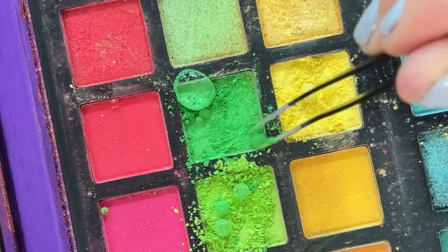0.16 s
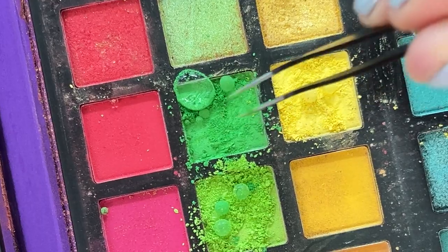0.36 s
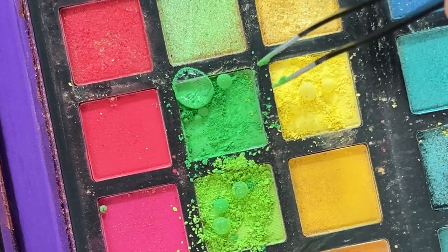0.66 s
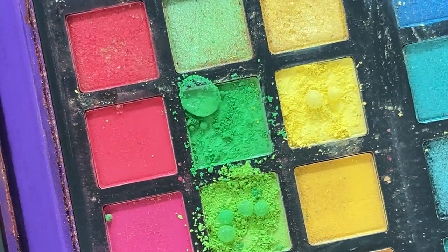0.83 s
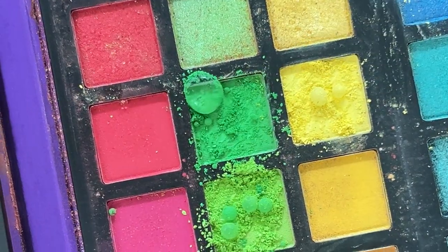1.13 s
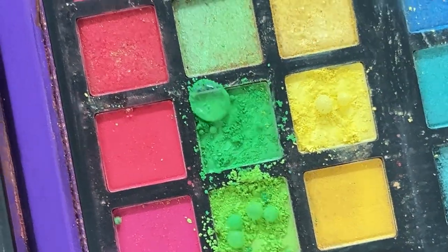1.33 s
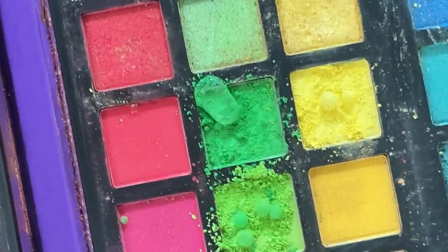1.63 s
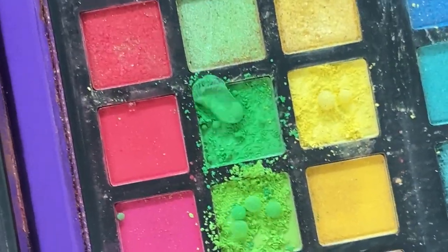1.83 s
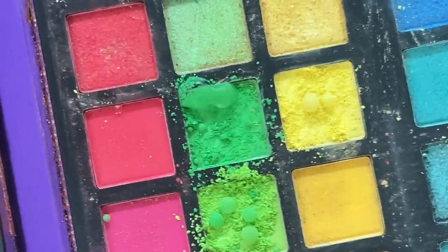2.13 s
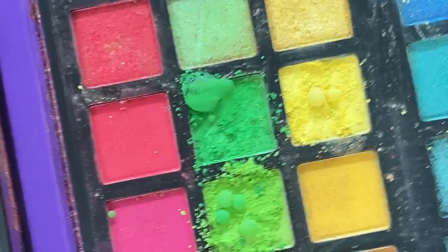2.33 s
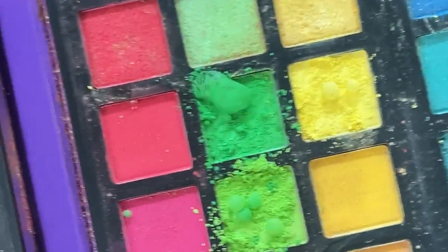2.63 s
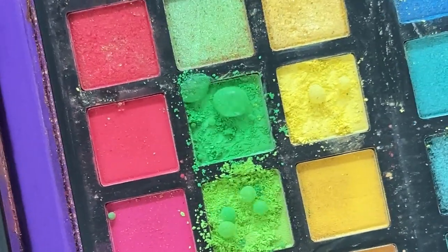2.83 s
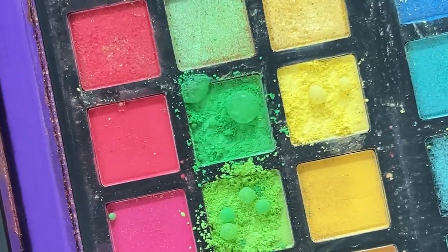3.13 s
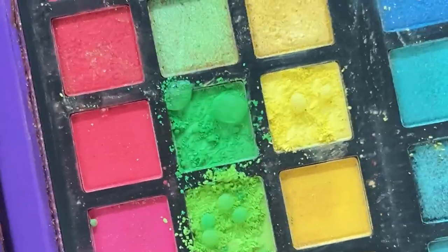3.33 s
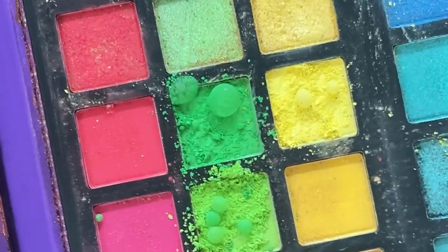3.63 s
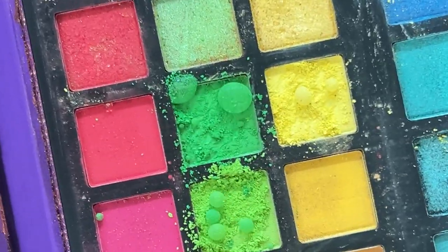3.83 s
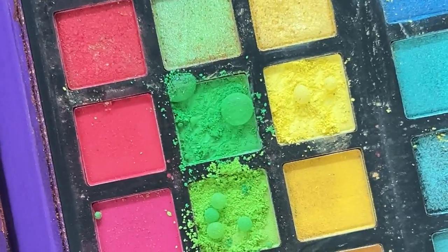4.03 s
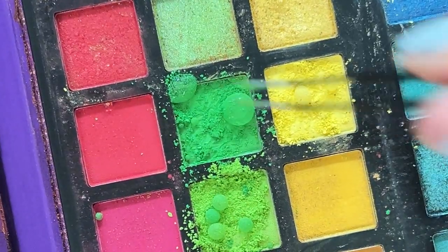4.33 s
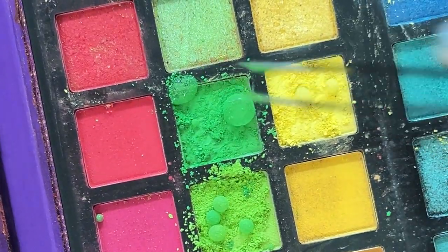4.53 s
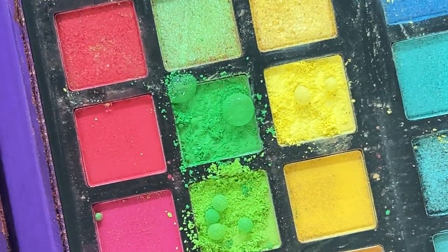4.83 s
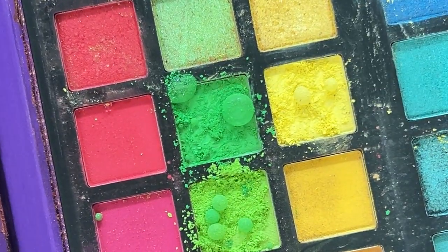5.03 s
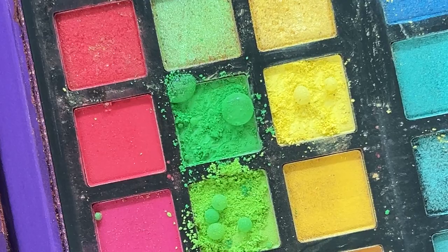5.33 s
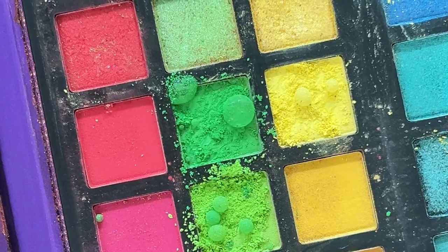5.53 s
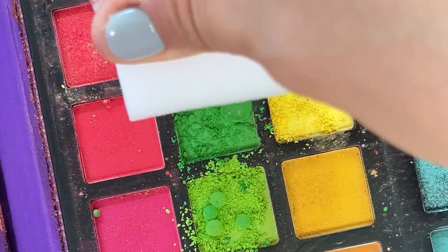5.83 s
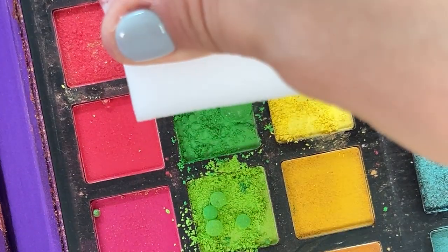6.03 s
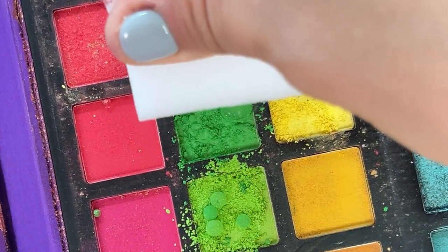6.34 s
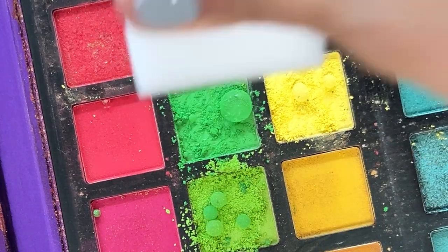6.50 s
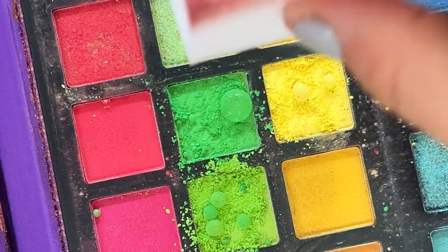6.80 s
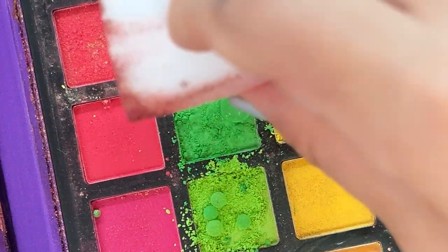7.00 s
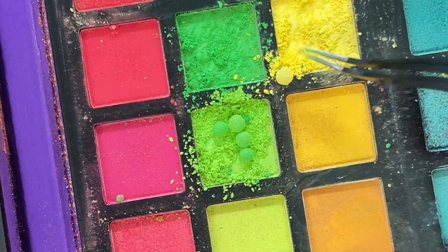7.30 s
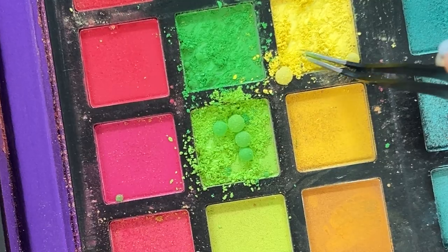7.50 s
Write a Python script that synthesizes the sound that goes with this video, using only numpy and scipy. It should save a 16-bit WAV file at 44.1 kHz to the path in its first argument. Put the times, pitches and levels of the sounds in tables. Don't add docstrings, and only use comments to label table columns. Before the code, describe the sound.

A small quiet room, heard very close, with soft low rumble, steady hiss and barely audible high ticking from the lens drive. Two faint taps come at 0.2 s, then light scrapes until 1.5. From 1.8 to 3.1 tweezer tips knock a hollow plastic palette about every 0.2 s, strongest at first, each a doubled clack with a short boxy boom, while quick gritty strokes stir the powder. Sparser taps follow at 3.3, 3.5 and 3.8. A far bird whistles thinly around 3.9-4.3. A weak tap sounds at 4.5. From 5.25 the tweezers slip with tiny ticks, hit hard at 5.53 with bright steel ringing, rebound at 5.6, and are cut off at 5.63. Near quiet follows. From 6.5 to 7.1 paper slips and drags, loudest around 6.6-6.8, breaking into crisp snaps and crackles. Then only hiss, rumble and one faint tap at 7.5.

```python
import sys
import numpy as np
from scipy import signal
from scipy.fft import rfft, irfft, next_fast_len
from scipy.io import wavfile
from scipy.ndimage import map_coordinates

SR = 44100
rng = np.random.default_rng(int(sys.argv[2]) if len(sys.argv) > 2 else 0)


def level_to_linear(level):
    exponent = np.asarray(level, float) / 20
    return 10 ** exponent


def persist_wave(psi):
    counts = np.round(np.clip(psi, -1, 1) * 32767).astype(np.int16)
    wavfile.write(sys.argv[1], SR, np.atleast_2d(counts).T)


N = 337955

# frequency in Hz, level in dB per Hz.
SLIDING = [(400, -23.5), (1500, -0.5), (2500, -4), (3600, 1.5), (4500, -7.5), (6200, -4), (7000, -0.5),
           (7800, -6), (11000, -9), (15500, -11.5)]


def unit(x):
    return x / np.sqrt(np.mean(x ** 2) + 1e-20)


def along(points, hz):
    f, v = np.transpose(points)
    return np.interp(np.log(hz + 1), np.log(f + 1), v)


def curve(rows):
    s, db = np.transpose(rows)
    return level_to_linear(np.interp(np.arange(N) / SR, s, db, left=-140, right=-140))


def wobble(rate):
    knots = rng.standard_normal(int(N * rate / SR) + 4)
    return map_coordinates(knots, [np.arange(N) * rate / SR])


def filtered(x, response):
    m = next_fast_len(N + SR // 2)
    return irfft(rfft(x, m) * response(np.fft.rfftfreq(m, 1 / SR)), m)[..., :N]


def hiss(spectrum, grain_db=0):
    grain = level_to_linear(grain_db * np.minimum(rng.exponential(size=N), 4))
    white = rng.standard_normal(N) * grain
    return unit(filtered(white, lambda hz: level_to_linear(along(spectrum, hz))))


def add(track, s, piece):
    part = track[max(round(s * SR), 0):][:len(piece)]
    part += piece[:len(part)]


def fade(t60):
    return level_to_linear(-60 * np.arange(SR // 3) / SR / t60)


def swells(rows, edge):
    out = np.zeros(N)
    for s, db, length in rows:
        reach = min(2 * length, s)
        t = np.arange(-reach, reach, 1 / SR)
        add(out, s - reach, level_to_linear(db) * np.exp(-np.abs(t / (0.58 * length)) ** edge))
    return out


def ring(modes, scatter_db, detune):
    t = np.arange(SR // 3) / SR
    hz, db, t60, rise = np.transpose(modes)[:, :, None]
    chance = rng.standard_normal((2, len(modes), 1))
    decay = level_to_linear(db + scatter_db * chance[0] - 60 * t / t60)
    onset = 1 - np.exp(-t / rise)
    tone = np.sin(2 * np.pi * hz * (1 + detune * chance[1]) * t)
    return np.sum(decay * onset * tone, axis=0)


def room(x):
    # frequency in Hz, t60 in seconds.
    decay_times = [(200, 0.93), (2000, 0.32), (10000, 0.22)]
    hz, t, z = signal.stft(rng.standard_normal(SR // 2), SR, nperseg=256)
    dying = level_to_linear(-60 * t / along(decay_times, hz)[:, None])
    tail = signal.istft(z * dying, SR, nperseg=256)[1]
    return signal.fftconvolve(x, tail / np.linalg.norm(tail))[:N]


def background():
    # frequency in Hz, level in dB per Hz.
    rumble_colour = [(15, -44.5), (25, -20.5), (43, -11.5), (60, 3), (75, -4), (100, -10), (140, -21),
                     (200, -61)]
    drone_colour = [(50, -38.5), (100, -3.5), (130, -1), (235, -3.5), (300, -5), (350, -7), (385, -14),
                    (450, -24), (600, -49)]
    mic_colour = [(300, 1.5), (500, -3), (800, -6.5), (1300, -0.5), (2000, -2.5), (3000, -2), (4000, -12.5),
                  (5000, -24.5), (6200, -14.5), (7500, -0.5), (8600, -17.5), (9700, -26), (12000, -12.5),
                  (15000, -10)]
    # time in seconds, level in dB.
    stirred = [(0, -5), (1, -1.5), (2, 0.5), (2.7, 1.5), (3.3, -2.5), (4.8, -1), (5.45, 4.5), (6.25, -2.5),
               (6.6, 6.5), (7.66, -4.5)]
    # centre in seconds, level in
    # dB, length in seconds.
    bumps = [(1.02, -62, 0.041), (1.9, -61, 0.063), (2.75, -66, 0.047), (2.93, -68, 0.09), (3.7, -69, 0.13),
             (4.02, -69, 0.049), (4.33, -70, 0.057), (4.58, -62, 0.1), (5.1, -53.5, 0.064),
             (5.33, -59.5, 0.11), (5.555, -48, 0.034), (5.87, -60, 0.11), (6.43, -59.5, 0.096),
             (6.72, -62, 0.12), (7.2, -60.5, 0.18), (7.5, -65.5, 0.089)]
    rumble = (level_to_linear(-69 + 1.4 * wobble(9)) + swells(bumps, edge=1.7)) * hiss(rumble_colour)
    drone = curve(stirred) * level_to_linear(-70.5 + 2.2 * wobble(14)) * hiss(drone_colour)
    return rumble + drone + level_to_linear(-70.5 + 0.3 * wobble(2.7)) * hiss(mic_colour)


def side_air():
    # frequency in Hz, level in dB per Hz.
    air_colour = [(100, -40.5), (230, -3.5), (700, -2), (1500, -13.5), (1850, -48)]
    return level_to_linear(-81.0) * hiss(air_colour) * [[1], [-1]]


def lens():
    # start of the shot in seconds, a moment its beat of ticks falls on in seconds.
    shots = [
        (0, 0.033),
        (.853, 0.78),
        (5.626, 5.647),
        (7.12, 7.4),
    ]
    t = np.arange(N) / SR
    start, first = np.transpose(shots)
    shot = np.maximum(np.searchsorted(start, t, "right") - 1, 0)
    beat = (t - first[shot]) * 30
    blip = np.exp(-((beat - np.round(beat)) / 0.059) ** 2)
    return level_to_linear(-80.0 + 1.7 * wobble(25)) * blip * np.sin(2 * np.pi * 9140 * t)


def taps():
    # time in seconds, peak in dB, hollow in dB, lid in dB, cavity pitch in Hz.
    blows = [(0.199, -53.5, -5.5, -21, 310), (0.237, -54.5, -6.5, -13, 306), (1.494, -50, -13, -17, 395),
             (1.789, -27.5, -18.5, -8, 394), (1.971, -31.5, -11, -7.5, 389), (2.17, -34, -11, -6, 377),
             (2.338, -34.5, -16, -11, 404), (2.502, -37, -11.5, -5.5, 405),
             (2.739, -31.5, -17.5, -9.5, 444), (2.894, -38.5, -17.5, -17.5, 427),
             (3.049, -52, -12, -22, 403), (3.266, -52, -4.5, -21, 331), (3.534, -36.5, -18, -18, 404),
             (3.829, -34, -8.5, -7.5, 389), (4.006, -48, -8, -38, 376), (4.517, -42, -20, -23, 320),
             (4.672, -60, -4, -25, 426), (5.1, -52.5, -14, -17, 467), (7.485, -52, -11.5, -13, 311)]
    # ratio to the cavity pitch, level in dB, t60 in seconds, rise in seconds.
    cavity_modes = [(1.009, 3, 0.11, 0.0049), (0.776, -10.5, 0.061, 0.0034), (1.245, -12.5, 0.029, 0.0042)]
    # frequency in Hz, level in dB, t60 in seconds, rise in seconds.
    lid_modes = [(655, -5.5, 0.044, 0.00073), (895, 0, 0.0264, 0.0015), (1274, -0.5, 0.04, 0.0011),
                 (1401, 1, .03, 0.0012), (1534, 3.5, 0.029, 0.0014), (1720, -14, 0.026, 0.0011)]
    tray_modes = [(397.6, -1, 0.21, 0.008)]
    # frequency in Hz, level in dB per Hz.
    knock_colour = [(150, -32.5), (300, 8), (500, 1.5), (800, -4), (1400, -6), (1800, -21), (2200, -42)]
    second_tip_s = 0.0053
    out, knock, tick = np.zeros((3, N))
    grip = np.exp(-(np.arange(SR // 3) / SR / 0.015) ** 3)
    for s, db, hollow_db, lid_db, cavity_hz in blows:
        cavity = ring(np.multiply(cavity_modes, [cavity_hz, 1, 1, 1]), scatter_db=1.0, detune=0.0048)
        add(out, s + 0.00402, level_to_linear(db + hollow_db + 8) * grip * cavity)
        add(out, s + 0.006, level_to_linear(db + hollow_db - 8) * ring(tray_modes, scatter_db=1.5, detune=0.008))
        for at, tip_db in ((s, db), (s + second_tip_s, db - 6.0)):
            lid = grip * ring(lid_modes, scatter_db=0.5, detune=0.028)
            add(out, at - 0.0005, level_to_linear(tip_db + lid_db + 0.5) * lid)
            add(knock, at, level_to_linear(tip_db - 14.0) * fade(0.053))
            add(tick, at - 0.001, level_to_linear(db + lid_db - 13.5) * fade(0.0052))
    return out + knock * hiss(knock_colour) + tick * rng.standard_normal(N)


def scrapes():
    # centre in seconds, level in dB, length in seconds, brightness in dB.
    lone = [(0.223, -85.5, 0.038, 4), (0.727, -72, 0.071, 1.5), (0.878, -81, 0.054, 5),
            (0.975, -63.5, 0.056, -9), (1.159, -79.5, 0.046, 11), (1.428, -62.5, 0.098, -9.5),
            (1.575, -69, 0.054, -10.5), (1.816, -64.5, 0.054, -12.5), (2.089, -56, 0.057, -7),
            (3.309, -53, 0.0595, -7.5), (4.546, -77, 0.09, -1.5), (5.108, -79.5, 0.11, 2.5),
            (5.759, -73, 0.065, -3)]
    # centre in seconds, level in dB.
    stirring = [(1.323, -66.5), (1.729, -63), (1.913, -66.5), (2.003, -58.5), (2.192, -58), (2.28, -64),
                (2.378, -56.5), (2.483, -56), (2.589, -56), (2.688, -55.5), (2.793, -60.5), (2.998, -71),
                (3.105, -69), (3.207, -82), (3.456, -62), (3.554, -71.5), (3.69, -75.5), (3.845, -72)]
    # frequency in Hz, level in dB per Hz.
    powder_colour = [(400, -8), (800, -4), (1400, 3), (2200, 0.5), (3900, 0.5), (5800, -2.5), (8000, -9.5),
                     (12000, -39)]
    dust_colour = [(3000, -34), (4800, -11), (6000, -0.5), (8000, -1.5), (10500, -4.5), (15500, 0.5)]
    strokes = list(lone)
    for s, db in stirring:
        lighter_db = db + 56
        length = max(0.058 + 0.1 * lighter_db, 0.038)
        bright_db = max(-4 + 1.5 * lighter_db, -8.5)
        strokes.append((s, db, length, bright_db))
    body = swells([(s, db + 1.5, length) for s, db, length, _ in strokes], edge=2.8)
    bright = swells([(s, db + bright_db + 7.0, length) for s, db, length, bright_db in strokes], edge=3.1)
    crumble = level_to_linear(1.64 * wobble(120))
    return crumble * (body * hiss(powder_colour, grain_db=3.0) + bright * hiss(dust_colour, grain_db=2.0))


def paper():
    # time in seconds, peak in dB, flap in dB.
    snaps = [(2.088, -40, -15), (5.746, -52.5, -4), (6.498, -45.5, -8.5), (6.526, -38, -7.5),
             (6.558, -48, -2), (6.5983, -34, -6), (6.6195, -31, -7), (6.645, -38, -5.5), (6.9205, -48, -6),
             (6.576, -33, 6), (6.589, -27, -4), (6.7226, -34, -5), (6.6941, -26, -1), (6.7096, -31, -9.5),
             (6.7135, -34, -8), (6.7422, -26.5, -4), (6.8374, -33.5, 0.5), (6.8432, -32, 1),
             (6.8512, -40, 7), (6.8618, -43, 9.5), (6.8743, -44, -5), (6.8818, -36.5, 3.5),
             (6.898, -45, -4), (6.9075, -34, -3.5), (6.9164, -47, 8.5), (6.9346, -29, -10.5),
             (6.947, -29.5, -11), (6.9533, -36, -3), (6.958, -45, -5), (6.9707, -32, -6), (6.9913, -42, 1),
             (6.9848, -31, -5.5), (7.012, -34, -15), (7.022, -52.5, 7), (7.0335, -30, -11),
             (7.057, -34, -6), (7.072, -33, -2.5), (7.0899, -38, -1.5), (7.113, -48.5, 4.5)]
    # time in seconds, peak in dB, flap in dB.
    slips = [
        (6.5224, -44.5, -11),
        (6.5693, -39, -1.5),
        (6.597, -34, -5),
        (6.616, -32.5, -7.5),
        (6.6421, -34.5, -11.5),
        (6.6695, -35.5, -8.5),
        (6.689, -32.5, -20),
        (6.707, -35.5, -7.5),
        (6.7217, -44, 0.5),
    ]
    # centre in seconds, level in dB, length in seconds.
    drags = [
        (6.47, -72.5, .06),
        (6.51, -61, 0.0395),
        (6.56, -57, 0.057),
        (6.655, -61, .05),
        (6.76, -49.5, 0.1),
        (6.93, -68, .3),
    ]
    # centre in seconds, level in dB, length in seconds.
    brushes = [
        (6.475, -67, .06),
        (6.53, -55.5, 0.066),
    ]
    # frequency in Hz, level in dB per Hz.
    flap_colour = [(250, -20), (500, -8), (900, -3), (1250, -4), (1700, -9), (2600, -23.5)]
    ripple_colour = [(400, -26), (700, -4), (1100, 0), (1700, -0.5), (2500, -5.5), (4500, -14.5)]
    crisp_colour = [(400, -28), (800, 2), (1500, -9), (2800, -7), (4300, 4.5), (5400, 0), (7000, -4.5),
                    (15500, -11)]
    soft_colour = [(600, -24), (1100, -7), (2200, -1), (3000, 0), (3900, -3.5), (4800, -16), (8000, -14),
                   (12000, -26)]
    bend_s = 0.0028

    fibre = swells(drags, edge=4.6) * level_to_linear(1.36 * wobble(200))
    flap, ripple, clicks = np.zeros((3, N))
    add(flap, 0, level_to_linear(-7.5) * fibre)
    t = np.arange(SR // 20) / SR
    # events, length in seconds, abruptness of the stop, low layer, its lateness in seconds
    for rows, length, edge, low, late in ((slips, 0.013, 2.5, flap, 0), (snaps, 0.002, 1.5, ripple, 0.0012)):
        burst = (1 - np.exp(-t / 0.000599)) * np.exp(-(t / length) ** edge)
        for s, db, flap_db in rows:
            add(fibre, s, level_to_linear(db - 12.5) * burst)
            add(low, s + late, level_to_linear(db + flap_db - 5.5) * burst)
    for s, db, _ in snaps:
        add(clicks, s, level_to_linear(db - 5) * unit(rng.standard_normal(12) * fade(0.0004)[:12]))

    def bend(hz):
        return level_to_linear(along(crisp_colour, hz)) * np.exp(-4j * np.pi * bend_s * np.sqrt(1000 * hz))

    sheet = flap * hiss(flap_colour) + ripple * hiss(ripple_colour)
    arrival = swells(brushes, edge=2.5) * hiss(soft_colour, grain_db=3.0)
    return fibre * hiss(SLIDING, grain_db=2.5) + sheet + filtered(clicks, bend) + arrival


def bird():
    # start in seconds, length in seconds, from Hz, to Hz, level in dB.
    whistles = [
        (3.915, .035, 3650, 3700, -82),
        (3.957, .095, 4060, 4000, -77),
        (3.94, .07, 2900, 2880, -82),
        (4.075, .04, 3850, 3820, -82),
        (4.13, .055, 3880, 4060, -82),
        (4.16, .045, 2960, 2720, -79),
        (4.205, .06, 3990, 3740, -79),
        (4.275, 0.037, 2970, 3060, -83),
    ]
    # centre in seconds, level in dB, length in seconds.
    echoes = [
        (4.0, -75, 0.18),
        (4.2, -76.5, 0.19),
    ]
    # frequency in Hz, level in dB per Hz.
    haze_colour = [(1500, -30), (2100, 1), (2900, -3), (3900, -1), (4600, -7), (5900, -13), (6500, -40)]
    out = np.zeros(N)
    for s, length, from_hz, to_hz, db in whistles:
        u = np.linspace(0, 1, round(length * SR))
        phase = 2 * np.pi * np.cumsum(from_hz + (to_hz - from_hz) * u) / SR
        voice = np.sin(phase) + level_to_linear(-12) * np.sin(2 * phase)
        add(out, s, level_to_linear(db + 2.5) * np.sin(np.pi * u) ** 0.5 * voice)
    return out * level_to_linear(2.5 * wobble(70)) + swells(echoes, edge=3.0) * hiss(haze_colour)


def drop():
    # time in seconds, peak in dB, table in dB, arm in dB, steel in dB.
    touches = [
        (5.234, -65.5, 11.5, -19.5, -20),
        (5.2845, -47.5, 5, 6.5, -0.5),
        (5.2885, -48, 17.5, 14, -3),
        (5.379, -47.5, -1, -16, -7.5),
        (5.39, -58, 14, -8.5, -10),
        (5.427, -54.5, -5.5, -6, -8),
        (5.4625, -48, -14, -13.5, 0.5),
        (5.4674, -44, -17, -12, -2.5),
        (5.4792, -49.5, -8, -21.5, -0.5),
    ]
    bounces = [
        (5.5205, -48, 9, -9.5, -25.5),
        (5.528, -11.5, -12.5, -23, -14),
        (5.5295, -24, 14, -20.5, -14),
        (5.533, -13, -18, -6, -2),
        (5.540, -32.5, -12.5, -8, -4.5),
        (5.581, -23.5, -4.5, -13, -16),
    ]
    rebounds = [
        (5.6014, -19.5, -16.5, 3, -4.5),
        (5.6035, -20.5, -6.5, 5, 5),
        (5.6065, -22.5, 4, -9, 0),
    ]
    # frequency in Hz, level in dB, t60 in seconds, rise in seconds.
    rim_modes = [(239.4, -3.5, 0.04, .001), (372, 2, 0.13, 0.002), (706, -17.5, 0.065, 0.00079),
                 (886, -8, 0.13, 0.002), (1050, -9.5, 0.029, .001)]
    table_modes = [(96, -13, 0.2, 0.015), (207.5, -8.5, 0.046, .002), (240, -6.5, .06, 0.0018),
                   (291, -3, 0.13, 0.0015), (376.5, 2, 0.2, 0.0013), (436, -5, 0.025, .001),
                   (479, -9, 0.07, 0.0013), (576, -8, 0.043, 0.001), (628, -10.5, .04, 0.00085),
                   (702, -5.5, 0.16, 0.0008), (985, -12.5, .05, .0006)]
    slap_modes = [(135, -2.5, .1, .005), (270, -2, .06, .003), (345, 1, .07, .003),
                  (430, -2, 0.0398, 0.00198), (620, -3.5, 0.043, .001), (790, -9, 0.045, .001)]
    arm_modes = [(1700, 0, 0.035, 0.00069), (1830, -5, 0.019, 0.00044), (2200, -13, 0.034, .0005),
                 (3318, -13.5, .02, 0.00046), (4850, -12, 0.019, 0.00056)]
    steel_modes = [(3683, -9, .11, .0005), (5400, 0, .016, .0005), (6775, -9, .03, .0005),
                   (7200, -16, .06, .0005), (7770, -10, .03, .0005), (8905, -3, .08, .0005),
                   (9345, 3, .02, .0005), (9835, -8, .16, .0005)]
    tip_modes = [(11970, 0, .22, .003), (12610, -6, .12, .0005), (13080, -2, .13, .003),
                 (15200, 6, .03, .0005)]
    # time in seconds, level in dB.
    pings = [
        (5.286, -69),
        (5.452, -60),
        (5.467, -58),
        (5.528, -36.5),
        (5.533, -33),
        (5.6035, -50),
    ]
    # centre in seconds, level in dB, length in seconds.
    jerks = [
        (5.305, -66, 0.037),
        (5.35, -67, 0.049),
        (5.395, -63.5, 0.055),
        (5.472, -64, .04),
        (5.52, -65, 0.018),
    ]
    # centre in seconds, level in dB, length in seconds.
    grazes = [
        (5.288, -56, .012),
        (5.37, -58.5, .13),
        (5.475, -54, 0.061),
        (5.533, -38, 0.0092),
        (5.605, -32, .008),
    ]
    # frequency in Hz, level in dB per Hz.
    graze_colour = [(14300, -60), (14900, -6.5), (15300, 0.5), (15800, -6.5)]
    clatter_colour = [(40, -39.5), (100, -4.5), (400, 5), (1000, -11.5), (2000, -8.5), (4500, -15),
                      (7000, -27), (9500, -17.5), (12000, -18.5), (15500, -14)]

    out, clatter, crack = np.zeros((3, N))
    for s, db in pings:
        add(out, s, level_to_linear(db) * ring(tip_modes, scatter_db=2.5, detune=0.00088))
    for contacts, body in ((touches, rim_modes), (bounces, table_modes), (rebounds, slap_modes)):
        if body is slap_modes:
            out = out * level_to_linear(-12 * np.clip((np.arange(N) / SR - 5.598) / 0.006, 0, 1))
        for s, db, table_db, arm_db, steel_db in contacts:
            add(out, s + 0.00098, level_to_linear(db + table_db - 7) * ring(body, scatter_db=1.74, detune=0.004))
            add(out, s, level_to_linear(db + arm_db - 4.0) * ring(arm_modes, scatter_db=2.5, detune=0.0053))
            add(out, s, level_to_linear(db + steel_db - 13) * ring(steel_modes, scatter_db=2.5, detune=0.0008))
            add(clatter, s, level_to_linear(db - 20) * fade(0.09))
            add(crack, s, level_to_linear(db - 3.5) * fade(0.00899))
    slide = swells(jerks, edge=2.3) * level_to_linear(2.2 * wobble(150)) * hiss(SLIDING, grain_db=4.5)
    whine = swells(grazes, edge=2.5) * hiss(graze_colour)
    return out + slide + whine + clatter * hiss(clatter_colour) + crack * rng.standard_normal(N)


def scene():
    scene_changes_s = 5.6258
    near, fall = taps(), drop()
    fall = (fall + level_to_linear(-12) * room(fall)) * (np.arange(N) / SR < scene_changes_s)
    palette = near + level_to_linear(-15) * room(near) + scrapes()
    mono = background() + lens() + palette + paper() + bird() + fall
    return mono + side_air()


def roll_off(x):
    return signal.sosfilt(signal.butter(12, 17150, fs=SR, output="sos"), x)


def record(dry):
    # frequency in Hz, phase by which the right leads in radians.
    spread = [(100, .03), (350, .15), (650, -.55), (1200, -.35), (1900, 0), (6600, 0), (7600, .6),
              (10000, 1.55), (12300, 2.5), (12700, 2.95), (13500, np.pi), (14600, np.pi), (15100, 3.36),
              (15800, 3.38)]
    # frequency in Hz, left minus right in dB.
    balance = [(60, -.3), (150, -1.5), (380, -4), (600, -2), (900, 0)]
    top_hz = 15800

    def ports(hz):
        lag = along(spread, hz) + 2 * np.arctan2(330 * hz, 5050 ** 2 - hz ** 2)
        lean = level_to_linear(along(balance, hz) / 2)
        treble_stop = np.where(hz > top_hz, 0.15, 1) * (hz < top_hz + 900)
        return np.array([lean * np.exp(-1j * lag), 1 / lean]) * treble_stop

    return roll_off(filtered(dry, ports))


dry = scene()
out = record(dry)
persist_wave(out)
```